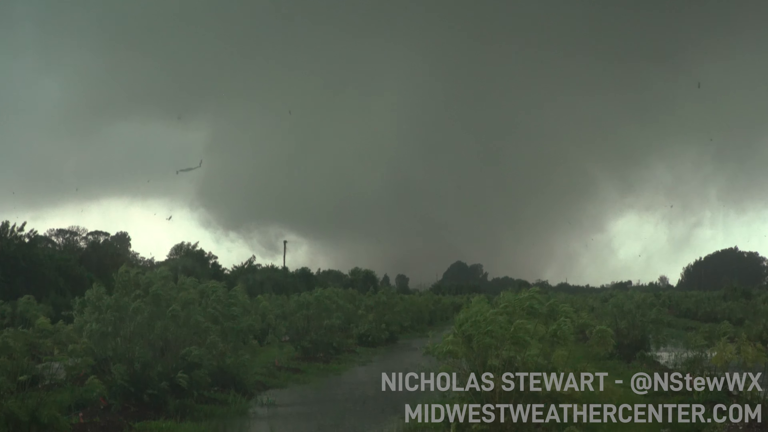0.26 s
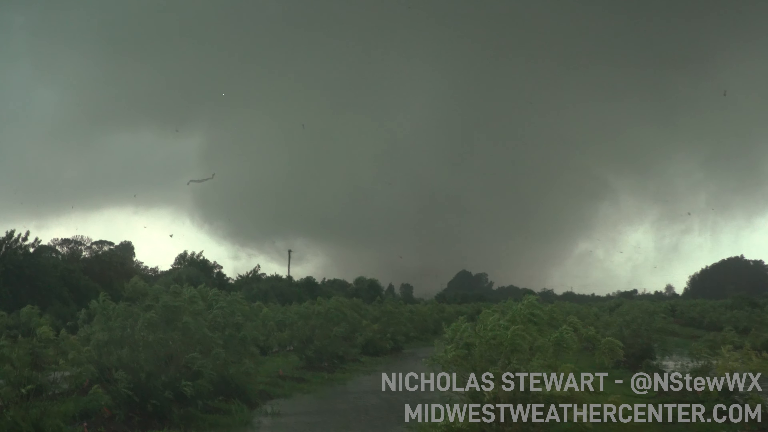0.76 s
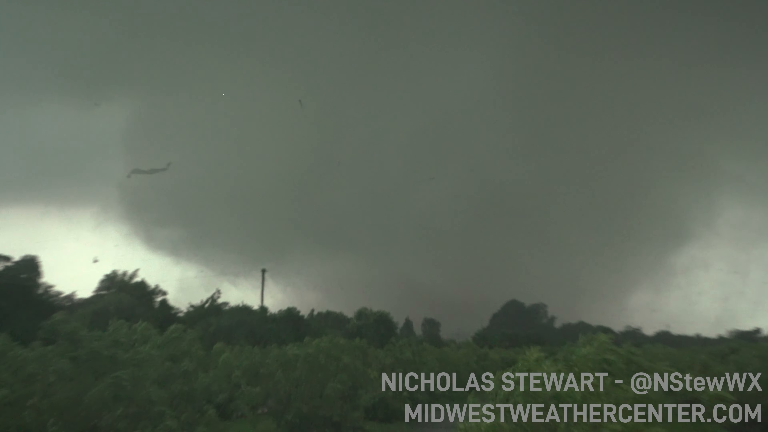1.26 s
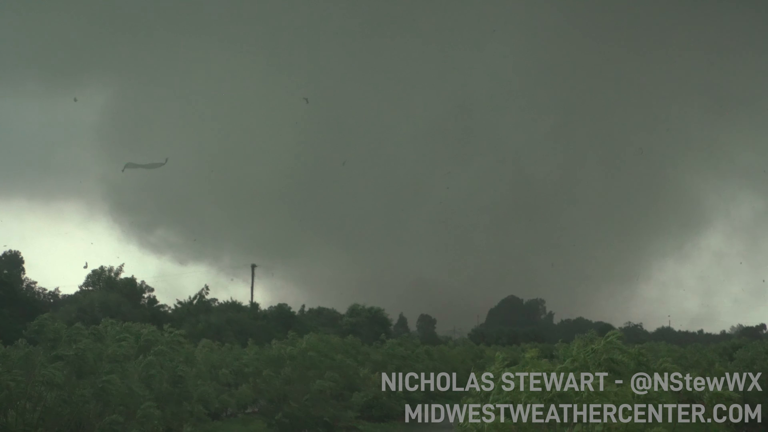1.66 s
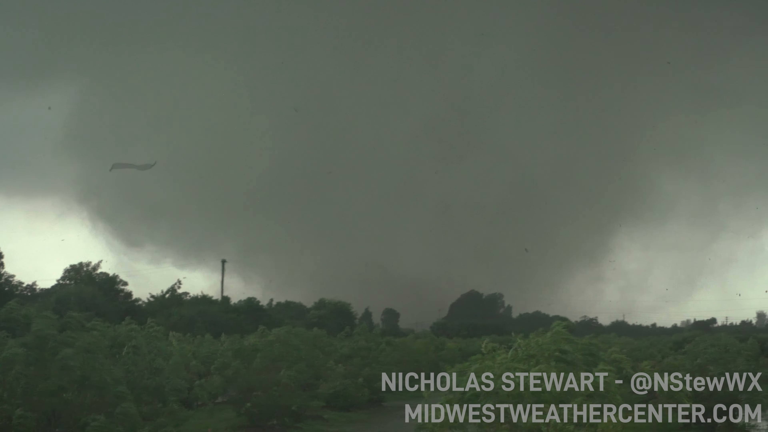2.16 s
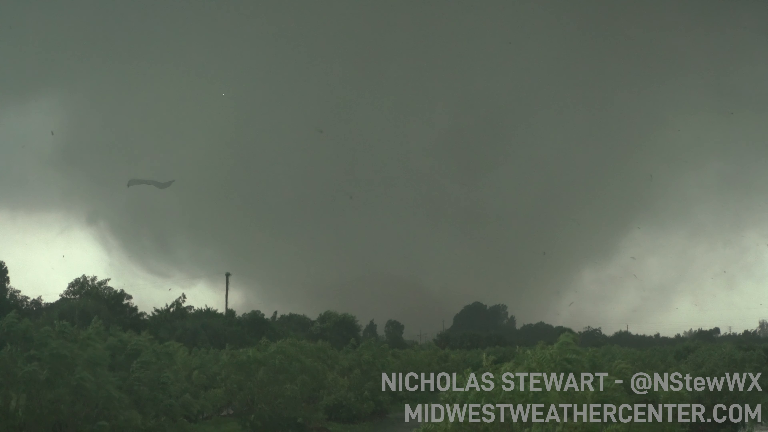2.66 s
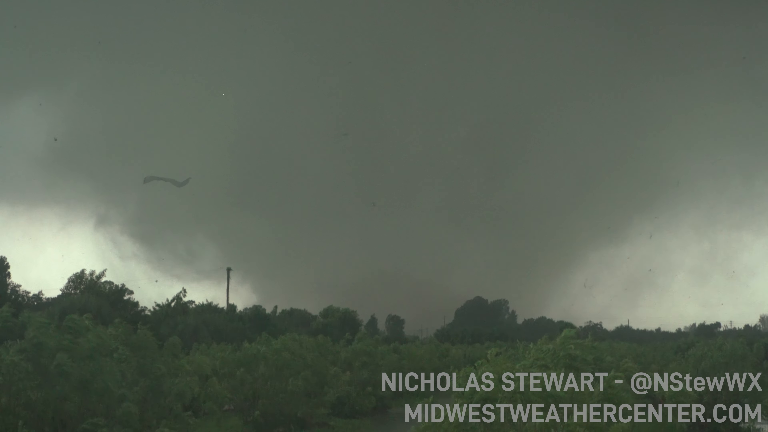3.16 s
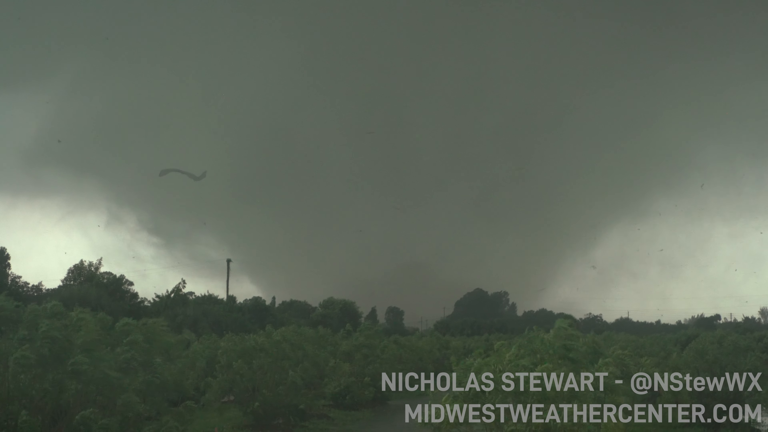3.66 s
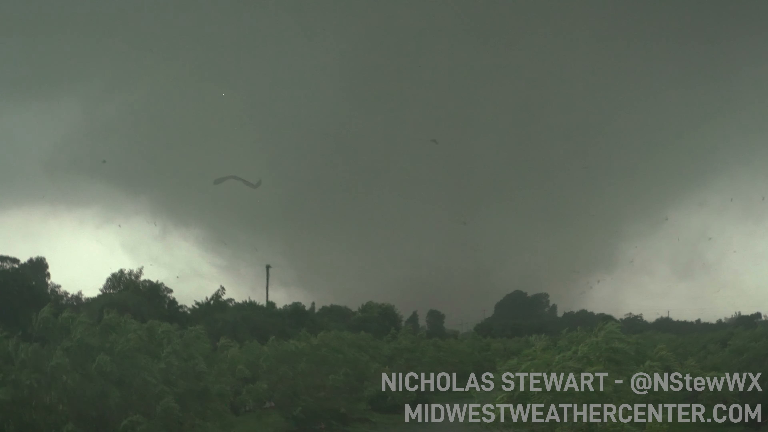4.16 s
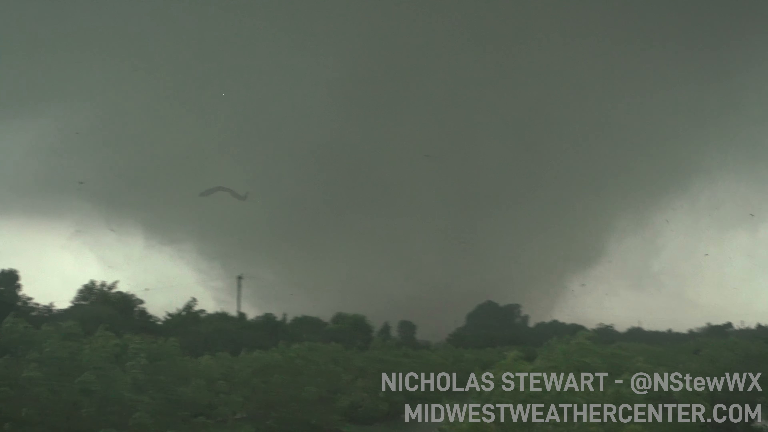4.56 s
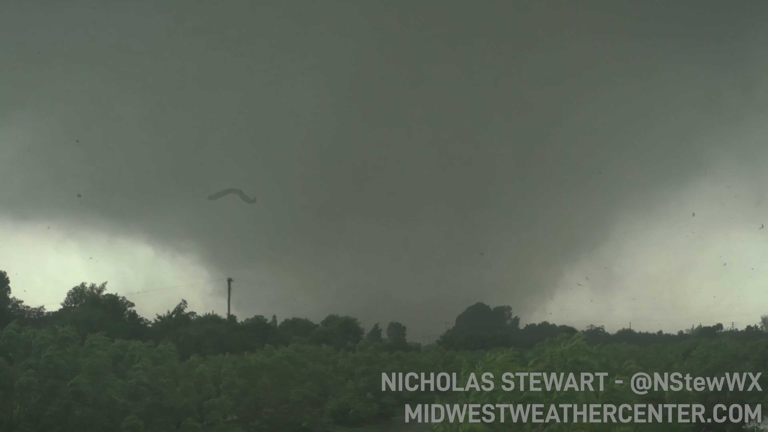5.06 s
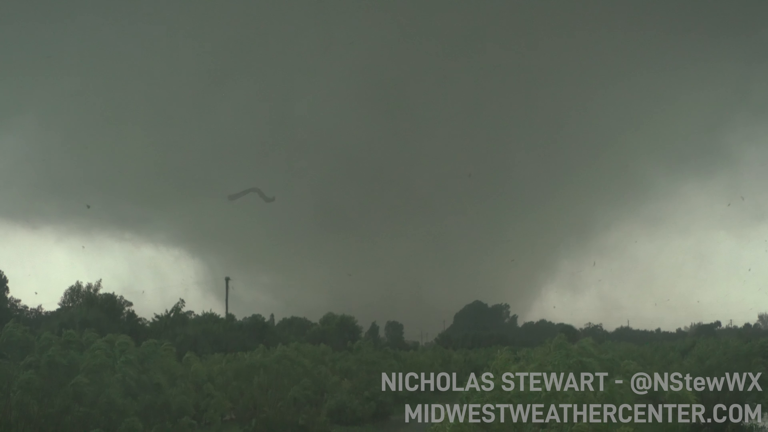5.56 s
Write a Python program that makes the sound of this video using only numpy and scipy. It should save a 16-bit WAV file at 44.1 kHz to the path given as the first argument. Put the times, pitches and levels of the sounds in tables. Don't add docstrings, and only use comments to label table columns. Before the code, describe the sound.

A far tornado gives a constant, smooth, deep roar with low rumble, swelling only slightly, under a soft hiss of rain and leaves. The microphone sits in an idling car with an open window. At the start the wind is light, with minute bird peeps in the first quarter second. From about 0.8 s a wiper swishes thinly over wet glass, starting with small ticks; around 1.4 s its blade flips in a quick dry rattle, then drags back until about 2 s. Wind thumps thicken from 0.9 s and are hardest at 2.5-2.9 s; the background dips slightly, then recovers. It is calmer from 3.2 to 3.9 s. A fainter wiper stroke begins near 4.1 s and clatters at 4.7-4.76 s. Fluttering gusts return around 4.4, 4.6, 5.2 and 5.6 s. A very faint high insect buzz, injector ticks and electric whine stay almost buried; a faint low bird note comes near 5.5 s.

```python
import sys
import numpy as np
from scipy import signal
from scipy.fft import rfft, irfft, next_fast_len
from scipy.io import wavfile
from scipy.ndimage import uniform_filter1d

SR = 44100
rng = np.random.default_rng(int(sys.argv[2]) if len(sys.argv) > 2 else 0)


def wav_out(sig):
    wavfile.write(sys.argv[1], SR, np.round(np.clip(np.atleast_2d(sig).T, -1, 1) * 32767).astype(np.int16))


def to_linear_factor(level_db):
    exponent = np.asarray(level_db, float) / 20
    return 10 ** exponent


N = 255780

# [t/s, length/s, f/Hz, glide/Hz, peak level/dB]
BIRD_NOTES = [
    (.03, 0.025, 3400, 142.5, -53),
    (.175, 0.056, 3500, -60, -56),
    (4.4, .022, 3450, 58, -56),
    (5.49, 0.12, 1860, 2, -53.5),
]

# [t/s, level/dB, length/s]
INSECT_RESTS = [(.3, -5, 0.26), (1.1, -3, .4), (1.65, -10, 0.46), (2.35, -3, .4), (2.85, -7, 0.52),
                (3.8, -5, .2), (4.55, -2.5, 0.55), (4.9, -6, .2)]
INSECT_HZ, INSECT_RATE_HZ, INSECT_PHASE, INSECT_DB = 9070, 63.06, .7, -72.5

# [t/s, firings per s]
ENGINE_FIRING = [(0, 23.7), (2.3, 23.76), (3.0, 23.45), (3.7, 23.2), (4.3, 23.2), (5.8, 23.7)]
ENGINE_PHASE = .45
INJECTOR_HZ, INJECTOR_DB = 11800, -33
WHINE_HZ, WHINE_DB = 13699, -41

# [t/s, roar level/dB]
FUNNEL_ROAR = [(0, -35), (.3, -33.5), (.6, -35), (.9, -31.5), (1.8, -32.5), (2.2, -31.5), (2.6, -33.5),
               (3.2, -32.5), (3.9, -33.5), (4.3, -31), (4.8, -33), (5.1, -32), (5.8, -35)]
# [t/s, level/dB over the mean hiss]
SHOWERS = [(0, -1), (.6, .5), (1.3, 1.5), (1.8, 0.5), (2.5, 0), (3.9, -1), (4.3, .5), (4.9, 0), (5.8, -2)]
# [f/Hz, level/dB per Hz]
RUMBLE_SPECTRUM = [(95, -18), (130, -2), (180, 1.5), (250, -8), (330, -29.5)]
ROAR_SPECTRUM = [(150, -26), (250, -4.5), (428, -8), (468, -9.5), (523, -11), (568, -12.5), (643, -14),
                 (1300, -31.5), (1690, -63), (2860, -120)]
HISS_SPECTRUM = [(700, -1.5), (950, -4.5), (1500, -6), (2500, -16), (3000, -16), (3800, -20.5),
                 (4500, -27.5), (6500, -32.5), (8300, -34), (10500, -42.5), (13000, -45), (15600, -49)]
# [f/Hz, width/Hz, level/dB]
CABIN_HOLLOWS = [(5500, 670, 1), (7450, 400, -3.5), (12100, 770, -5)]
ROAR_MEAN_DB, HISS_DB = -33, -51
RUMBLE_DB, RUMBLE_FOLLOW = -33.5, 1.3

# [f/Hz, level/dB per Hz]
SWISH_SPECTRUM = [(2940, -30), (5000, -5), (5440, 1.5), (6490, -5), (7580, -4), (10600, -9), (12100, -6.5),
                  (14000, -13), (15500, -15.5)]
# [t/s after the start, level/dB under the fastest moment]
WIPE_SPEED = [(0, -34), (.04, -8.5), (.26, -8), (.48, -1), (.54, -1.5), (.59, -8.5), (.7, -11.5),
              (1.19, -16), (1.26, -27.5)]
# [t/s, peak level/dB, steepness: drier glass is steeper]
WIPER_STROKES = [
    (.76, -64, .9),
    (4.07, -66.5, 1.4),
]
# [t/s, blade peak level/dB, blade f/Hz, arm peak level/dB, arm f/Hz]
WIPER_TICKS = [(.7688, -55, 9000, -47, 2800), (.7843, -48, 8000, -48, 2500), (.7872, -45, 5500, -41, 2500),
               (1.387, -46, 5500, -39, 2300), (1.3973, -50, 5500, -47, 3000),
               (1.4203, -47, 5000, -45, 3200), (1.4251, -39, 5500, -39, 2600),
               (1.4313, -27, 5600, -29, 1760), (1.436, -35, 5800, -35, 1900),
               (1.4429, -43, 6000, -45, 2500), (4.1095, -46, 5400, -46, 2500),
               (4.7101, -46, 6000, -42, 2500), (4.7202, -51, 7000, -46, 2400),
               (4.7451, -39, 5500, -43, 2500), (4.7515, -26, 7000, -35, 4000),
               (4.7558, -39, 6000, -37, 2400), (4.7623, -35, 5500, -44, 3500)]
# [t/s, blade peak level/dB, blade f/Hz, arm peak level/dB, arm f/Hz]
LIP_FLIPS = [
    (1.4058, -34, 7000, -44, 3200),
    (1.4074, -39, 6000, -35, 2200),
    (4.728, -40, 6200, -34, 3000),
    (4.7298, -38, 7300, -34, 3000),
]
TICK_MS, FLIP_MS = .2, 1.2
RATTLE_DB = 2

# [f/Hz, level/dB per Hz]
BUFFET_SPECTRUM = [(7.1, -36), (12, -8.5), (38, 8), (54, -1.5), (75, -9), (98, -29), (160, -120)]
FLUTTER_SPECTRUM = [(32, -34), (55, 5.5), (150, -12), (200, -45), (330, -120)]
# [t/s, flutter level/dB]
WIND_FLOW = [(0, -31.5), (.25, -27), (.8, -22.5), (1.0, -21.5), (1.55, -22), (1.8, -26), (2.3, -23.5),
             (2.65, -21), (3.0, -27), (3.8, -25.5), (4.2, -26.5), (4.37, -15), (4.5, -24.5), (4.62, -16.5),
             (5.05, -27), (5.16, -21), (5.62, -15), (5.8, -22)]
# [t/s, buffet peak level/dB, length/s]
BIG_EDDIES = [(0.556, -29, 0.11), (0.879, -19.5, .08), (1.16, -26, 0.087), (1.283, -17.5, 0.047),
              (1.402, -19.5, 0.09), (1.591, -14, 0.074), (1.76, -17, 0.096), (1.856, -19.5, 0.11),
              (2.067, -22, 0.23), (2.233, -16, 0.047), (2.347, -14, 0.081), (2.472, -12.5, 0.075),
              (2.627, -9.5, 0.069), (2.739, -10, 0.069), (2.895, -11, 0.086), (3.043, -19.5, .08),
              (3.199, -20, 0.066), (3.357, -23, 0.15), (3.928, -25.5, 0.16), (4.115, -19.5, 0.096),
              (4.283, -17.5, 0.026), (4.352, -26, 0.035), (4.648, -18, 0.098), (4.735, -16, 0.052),
              (4.922, -18, 0.24), (5.073, -20.5, 0.042), (5.183, -13.5, 0.1), (5.313, -15, 0.11),
              (5.696, -18, 0.13), (5.764, -16, 0.083)]
LULL_DB, EDDY_FLUTTER_DB = -2, -13.5

DUCK_S, DUCK_DB, DUCK_ATTACK_S, DUCK_RELEASE_S = 2.63, -3, 0.037, 1


def level(x, db):
    return x * to_linear_factor(db) / np.sqrt(np.mean(x ** 2))


def read(table):
    s, *columns = np.transpose(table)
    return [np.interp(np.arange(N) / SR, s, c) for c in columns]


def bumps(rows):
    t = np.arange(N) / SR
    return sum(height * np.exp(-(2 * (t - s) / length) ** 2) for s, height, length in rows)


def band(x, lo_hz, hi_hz):
    return signal.sosfilt(signal.butter(4, [lo_hz, hi_hz], "band", fs=SR, output="sos"), x)


def ring(x, hz, width_hz):
    return signal.lfilter(*signal.iirpeak(hz, hz / width_hz, fs=SR), x)


def walk(rate):
    hold = int(SR / rate)
    steps = np.repeat(rng.standard_normal(N // hold + 1), hold)
    smooth = uniform_filter1d(uniform_filter1d(steps, hold), hold)[:N]
    return smooth / smooth.std()


def turbulence(spectrum, ref_hz, swell_db, flicker_db, flicker_rate):
    hz, db = np.transpose(spectrum)
    size = next_fast_len(N)
    octave = np.log2(np.fft.rfftfreq(size, 1 / SR) + 1)
    colour = to_linear_factor(np.interp(octave, np.log2(hz), db, left=-120, right=-120))
    noise = rfft(rng.standard_normal(size)) * colour
    swell = swell_db * walk(flicker_rate / 2)
    out = 0
    for centre in np.arange(np.log2(hz[0]), np.log2(hz[-1]) + .5, .5):
        share = np.clip(1 - 2 * np.abs(octave - centre), 0, 1)
        flicker = flicker_db * walk(flicker_rate)
        out = out + irfft(noise * share, size)[:N] * to_linear_factor(swell + flicker)
    return out / band(out, *ref_hz).std()


def steady(x, span_s, depth):
    power = uniform_filter1d(x ** 2, int(span_s * SR))
    y = x / (power + .02) ** (depth / 2)
    return y * x.std() / y.std()


def duck_db():
    t = np.clip(np.arange(N) / SR - DUCK_S, 0, None)
    return DUCK_DB * np.clip(t / DUCK_ATTACK_S, 0, 1) * np.exp(-(t / DUCK_RELEASE_S) ** 2)


def birds():
    out = np.zeros(N)
    for s, length, hz, glide_hz, db in BIRD_NOTES:
        u = np.linspace(0, 1, int(length * SR))
        i = int(s * SR)
        note = np.sin(2 * np.pi * np.cumsum(hz + glide_hz * u) / SR)
        out[i:i + len(u)] += to_linear_factor(db) * np.sin(np.pi * u) * note
    return out


def insect():
    phase = np.arange(N) / SR * INSECT_RATE_HZ + INSECT_PHASE
    contact = np.clip(.4 - 1.6 * np.cos(2 * np.pi * phase), 0, 1)
    wing = np.sin(2 * np.pi * np.cumsum(INSECT_HZ + 45 * walk(50)) / SR)
    throb = level(contact * to_linear_factor(1.5 * walk(40)) * wing, -1.5)
    return throb * to_linear_factor(INSECT_DB + bumps(INSECT_RESTS) + .6 * duck_db())


def injectors():
    phase = np.cumsum(read(ENGINE_FIRING)[0]) / SR + ENGINE_PHASE
    size = to_linear_factor(2.2 * rng.standard_normal(200))[phase.astype(int)]
    puff = size * np.exp(-(phase % 1) / .05) * rng.standard_normal(N)
    return level(ring(ring(puff, INJECTOR_HZ, 2200), INJECTOR_HZ, 2200), 0)


def idling_car():
    whine = np.sin(2 * np.pi * WHINE_HZ * np.arange(N) / SR)
    return to_linear_factor(WHINE_DB) * whine + to_linear_factor(INJECTOR_DB) * injectors()


def leaves_and_rain():
    hiss = turbulence(HISS_SPECTRUM, (1300, 3500), 0.4, 0.79, 14)
    return hiss + sum(to_linear_factor(db) * ring(hiss, hz, width) for hz, width, db in CABIN_HOLLOWS)


def storm():
    swell_db = read(FUNNEL_ROAR)[0] - ROAR_MEAN_DB
    duck = duck_db()
    rumble_db = RUMBLE_DB + RUMBLE_FOLLOW * swell_db + 0.18 * duck
    roar_db = ROAR_MEAN_DB + swell_db + 0.84 * duck
    hiss_db = HISS_DB + read(SHOWERS)[0] + 1.4 * duck
    rumble = steady(turbulence(RUMBLE_SPECTRUM, (130, 260), 0.15, 0.33, 33), 0.25, 0.16)
    roar = turbulence(ROAR_SPECTRUM, (260, 900), 0.22, 0.4, 7.3)
    hiss = leaves_and_rain() + idling_car()
    return to_linear_factor(rumble_db) * rumble + to_linear_factor(roar_db) * roar + to_linear_factor(hiss_db) * hiss


def wiper_swish():
    grain = to_linear_factor(1.6 * rng.exponential(size=N))
    swish = turbulence(SWISH_SPECTRUM, (10000, 15000), .5, .6, 30) * grain
    swish = swish / band(swish, 10000, 15000).std()
    gain = 0
    for start, top_db, steepness in WIPER_STROKES:
        stroke = [(start + s, top_db + steepness * db) for s, db in WIPE_SPEED]
        gain = gain + to_linear_factor(read(stroke)[0])
    return swish * gain


def wiper_rattle():
    out = np.zeros(N)
    rows = [(*r, TICK_MS) for r in WIPER_TICKS] + [(*r, FLIP_MS) for r in LIP_FLIPS]
    t = np.arange(int(0.022 * SR)) / SR
    bursts = rng.standard_normal((len(rows), len(t)))
    bursts[:len(WIPER_TICKS), 0] = 3
    for (s, blade_db, blade_hz, arm_db, arm_hz, slip_ms), burst in zip(rows, bursts):
        slip = burst * np.exp(-t / slip_ms * 1000)
        slip = slip + to_linear_factor(-18) * burst * np.exp(-t / 0.0038)
        blade = ring(slip, blade_hz, 3000)
        blade = band(ring(blade, blade_hz, 3000) + to_linear_factor(-17) * blade, 3500, 15000)
        arm = ring(slip, arm_hz, 1800) + to_linear_factor(5) * ring(slip, arm_hz, 300)
        arm = band(arm, 900, 4460)
        i = int(s * SR)
        for part, db in ((blade, blade_db), (arm, arm_db)):
            out[i:i + len(t)] += to_linear_factor(db + RATTLE_DB) * part / np.abs(part).max()
    return out


def wind():
    flow = to_linear_factor(read(WIND_FLOW)[0])
    eddies = bumps([(s, to_linear_factor(db), length) for s, db, length in BIG_EDDIES])
    buffet = steady(turbulence(BUFFET_SPECTRUM, (20, 60), .2, 0.34, 23), 0.11, 0.75)
    flutter = steady(turbulence(FLUTTER_SPECTRUM, (60, 130), 0.12, 0.2, 4.5), 0.059, 0.84)
    gusts = (to_linear_factor(LULL_DB) * flow + eddies) * buffet
    gusts = gusts + (to_linear_factor(-2) * flow + to_linear_factor(EDDY_FLUTTER_DB) * eddies) * flutter
    return signal.lfilter(*signal.butter(2, 500, fs=SR), gusts)


def scene():
    return (birds() + insect() + storm() + wiper_swish() + wiper_rattle() + wind())[None]


def top_cut(x):
    return signal.sosfilt(signal.butter(12, 15650, fs=SR, output="sos"), x)


def record(dry):
    mix = np.tanh(0.83 * dry) / 0.98
    return top_cut(mix)


dry = scene()
out = record(dry)
wav_out(out)
```